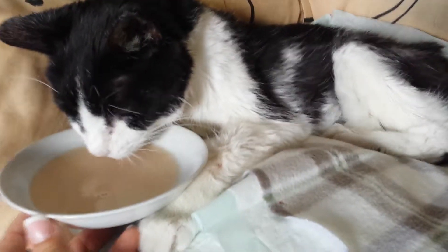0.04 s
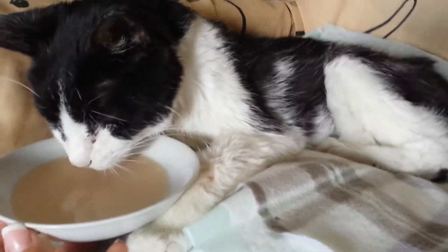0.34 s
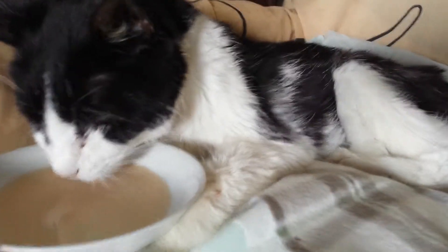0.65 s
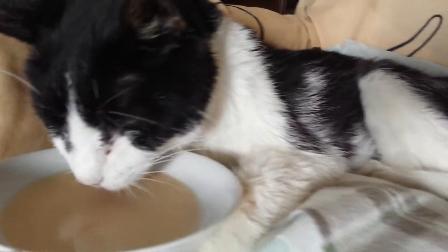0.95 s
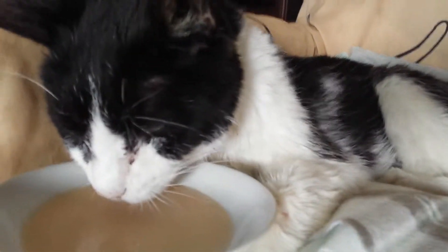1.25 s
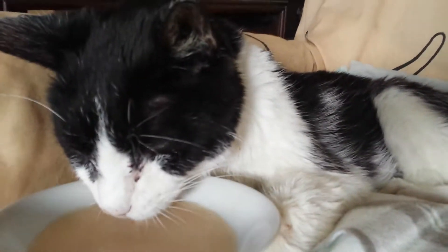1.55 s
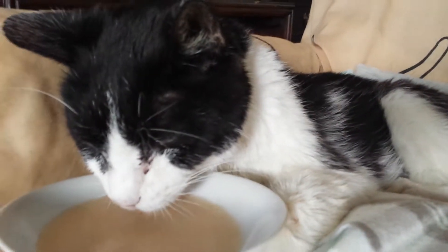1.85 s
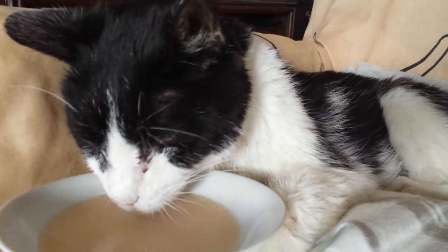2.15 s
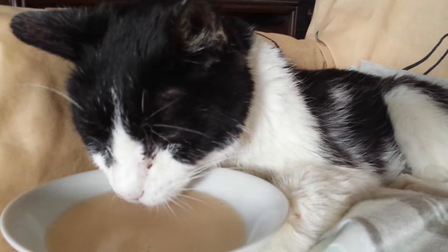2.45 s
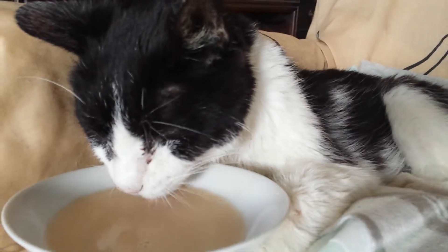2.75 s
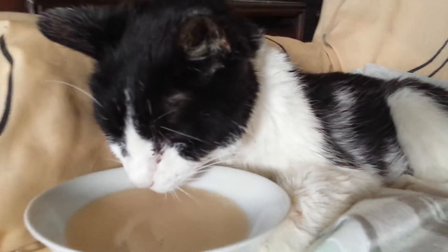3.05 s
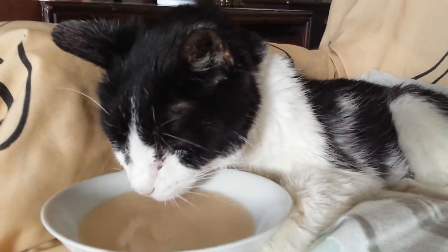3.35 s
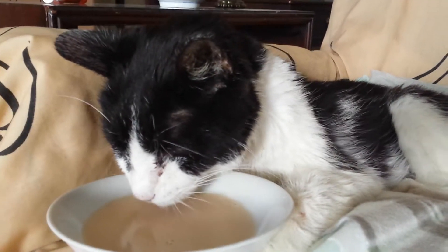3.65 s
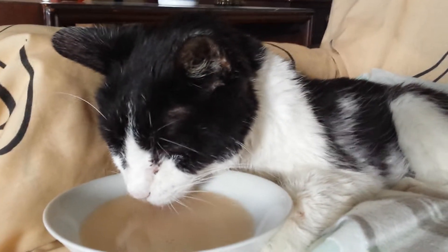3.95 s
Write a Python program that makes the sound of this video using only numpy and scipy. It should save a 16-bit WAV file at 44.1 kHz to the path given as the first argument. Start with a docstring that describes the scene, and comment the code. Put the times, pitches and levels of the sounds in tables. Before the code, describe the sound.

Small wet clicks of a cat drinking from a bowl continue unevenly, heard up close indoors. Cloth brushes softly and the microphone is bumped near the start, as a low hum sinks slightly in pitch and fades.

```python
"""Cat lapping, close up

Indoors, a cat laps from a bowl close to a phone's stereo microphone: each wet tick of the tongue
is a low pop, a bright ring and a tiny snap. Two low drones, like engines outside, sink in pitch
and fade over the wash of the room. Nearby, a soft rustle, coloured by the left microphone port,
dies away in the first half; cloth brushes and the hand rumbles on the phone."""
import sys
import numpy as np
from scipy import signal
from scipy.fft import rfft, irfft
from scipy.io import wavfile
from scipy.ndimage import uniform_filter1d

SR = 44100
rng = np.random.default_rng(int(sys.argv[2]) if len(sys.argv) > 2 else 0)


def to_wav(s):
    """Save 16-bit WAV."""
    ch = np.atleast_2d(s).T  # columns
    pcm = np.round(np.clip(ch, -1, 1) * 32767)  # PCM
    wavfile.write(sys.argv[1], SR, pcm.astype(np.int16))


N = 176400
TIME_S = np.arange(N) / SR
BIN_HZ = np.maximum(np.arange(N // 2 + 1) * SR / N, 1)


def undb(db):
    """Decibels to gain."""
    return 10 ** (np.asarray(db) / 20)


def stereo(left_db, right_db):
    """Gains for the two channels."""
    return undb([[left_db], [right_db]])


def curve(rows):
    """Join (time_s, value) rows by straight lines."""
    return np.interp(TIME_S, *np.array(rows).T)


def colour(rows):
    """Gain by frequency from (freq_hz, level_db) rows."""
    hz, db = np.array(rows).T
    return undb(np.interp(np.log(BIN_HZ), np.log(hz), db))


def resonance(hz, width_hz):
    """Complex gain of one resonance."""
    return 1 / (1 + 1j * (BIN_HZ ** 2 - hz ** 2) / (BIN_HZ * width_hz))


def noise(spectrum):
    """Noise of rms 1 with the given spectrum."""
    x = irfft(rfft(rng.standard_normal(N)) * spectrum, N)
    return x / x.std()


def wander(rate_hz):
    """Smooth random motion of rms 1."""
    return noise(np.exp(-(BIN_HZ / rate_hz) ** 2))


def swell(t, peak_s):
    """An envelope that rises to 1 at peak_s and dies away."""
    u = np.maximum(t, 0) / peak_s
    return u * np.exp(1 - u)


def bell(centre_s, spread_s):
    """A bell-shaped envelope."""
    return np.exp(-((TIME_S - centre_s) / spread_s) ** 2)


def add(out, start_s, sound):
    """Mix a short stereo sound in."""
    i = int(np.clip(start_s * SR, 0, N - 1))
    out[:, i:i + sound.shape[1]] += sound[:, :N - i]


def drone(pitch, level, partials, roughness):
    """A dull tone that swells and dips, with weaker, rougher partials that fade more evenly."""
    phase = 2 * np.pi * np.cumsum(curve(pitch)) / SR
    gain = undb(curve(level))
    trend = uniform_filter1d(gain, int(.8 * SR))  # 0.8 s average
    out = 0
    for multiple, db, rough in [(1, 0, roughness)] + partials:
        waver = np.sqrt(2 * (1 - rough ** 2)) + rough * (wander(7) + 1j * wander(7))
        tone = np.real(waver * np.exp(1j * multiple * phase))
        out += (gain if multiple == 1 else trend) * undb(db) * tone
    return out


# Sinking pitch of each drone: time_s, pitch_hz
LOW_DRONE_PITCH = [(0, 129), (.5, 126), (.7, 117.5), (.9, 111), (1.15, 107.5), (1.4, 109.5), (1.7, 110.5),
                   (2.1, 108.5), (3, 108), (4, 106.5)]
HIGH_DRONE_PITCH = [(0, 229.5), (.7, 226), (1.4, 224), (2.3, 220.5), (3, 217), (4, 215)]
# Their swells and dips: time_s, level_db
LOW_DRONE_LEVEL = [(0.0, -29), (0.05, -27.5), (0.13, -31), (0.23, -45), (0.24, -39), (0.3, -32),
                   (0.53, -37.5), (0.56, -44.5), (0.62, -31.5), (0.67, -32.5), (0.7, -60), (0.72, -36.5),
                   (0.88, -31.5), (1.02, -37.5), (1.08, -44), (1.16, -35), (1.28, -41.5), (1.32, -33),
                   (1.39, -31.5), (1.47, -49), (1.5, -40.5), (1.71, -38.5), (1.87, -45), (1.98, -71),
                   (2.05, -44), (2.31, -64), (2.54, -50.5), (3.78, -59.5), (3.82, -48), (4.0, -49)]
HIGH_DRONE_LEVEL = [(0.0, -65), (0.03, -44), (0.38, -49.5), (0.67, -41.5), (0.79, -44.5), (0.87, -55),
                    (0.91, -43), (0.96, -46.5), (0.99, -52), (1.09, -60.5), (1.2, -44.5), (1.27, -40),
                    (1.67, -43), (2.04, -55.5), (2.16, -53.5), (2.22, -45.5), (2.28, -48), (2.35, -60.5),
                    (2.64, -47.5), (2.75, -59.5), (2.87, -51), (3.02, -53.5), (3.1, -67), (3.36, -53),
                    (3.42, -62), (3.54, -48.5), (3.6, -49.5), (3.82, -63.5), (3.93, -59), (4.0, -61)]
# Their partials: pitch_ratio, relative_db, roughness_fraction
LOW_PARTIALS = [(0.629, -14, .3), (.84, -21, .6), (1.36, -22, .3)]
HIGH_PARTIALS = [(1.5, -23, .3), (2, -26, .4)]


def distant_drones():
    """Two drones, like engines outside, a touch left of centre."""
    low = drone(LOW_DRONE_PITCH, LOW_DRONE_LEVEL, LOW_PARTIALS, roughness=.08)
    high = drone(HIGH_DRONE_PITCH, HIGH_DRONE_LEVEL, HIGH_PARTIALS, roughness=.05)
    return (low + high) * stereo(.8, -.8)


# Room tone, then its side signal against its mid: freq_hz, relative_db
ROOM_SPECTRUM = [(20, -20), (35, 0.5), (55, -8.5), (85, 7), (130, 1), (180, -3), (270, -8.5), (400, -13),
                 (600, -18.5), (1000, -21), (1600, -29), (3000, -35.5), (6000, -39), (15000, -42)]
ROOM_SIDE = [(30, -17), (80, -19), (200, -8), (500, -7.5), (1000, -2.5), (2000, 0)]
# Fade of the room tone: time_s, relative_db
ROOM_LEVEL = [(0.0, -48), (0.01, -49), (0.1, -54), (1.45, -58), (1.47, -56.5), (1.84, -57.5), (1.85, -56),
              (1.95, -59.5), (3.56, -66), (3.59, -63), (3.92, -65), (4.0, -60.5)]


def room_wash():
    """Dull room noise that fades with the drones; its bass is alike in both channels."""
    spectrum = colour(ROOM_SPECTRUM)
    mid = noise(spectrum)
    side = irfft(rfft(noise(spectrum)) * colour(ROOM_SIDE), N)
    return np.array([mid + side, mid - side]) * undb(curve(ROOM_LEVEL)) * stereo(11.2, 9.8)


# Rustle near the microphone: freq_hz, relative_db
RUSTLE_SPECTRUM = [(500, -3.5), (1500, -3.5), (2500, 1), (4000, -2.5), (7000, 4), (8300, -1.5), (10000, -4),
                   (14500, -9.5)]
# Its fade: time_s, relative_db
RUSTLE_FADE = [(0, -53.5), (.06, -55), (.17, -61.5), (.4, -57.5), (.65, -54), (.85, -55), (1.17, -55.5),
               (1.33, -62.5), (1.75, -63), (2.05, -68), (2.42, -72.5), (2.9, -68.5), (3.2, -73.5), (4, -70)]
# Resonances of the microphone ports: freq_hz, width_hz, left_db, right_db
MIC_PORTS = [(2400, 500, 4, -20), (5600, 1260, 3.5, -16), (6650, 580, 7, -10)]


def close_rustle():
    """A soft, grainy rustle close by rings the microphone ports, mostly the left."""
    gain = undb(curve(RUSTLE_FADE) + wander(98))
    out = []
    for side in range(2):
        port_power = sum(abs(undb(db[side]) * resonance(hz, width)) ** 2 for hz, width, *db in MIC_PORTS)
        rustle = noise(colour(RUSTLE_SPECTRUM)) * gain
        out.append(irfft(rfft(rustle) * np.sqrt(1 + port_power), N))
    return np.array(out)


# Handling noise at the microphone: freq_hz, relative_db
RUMBLE_SPECTRUM = [(12, -2), (30, -2), (50, -8), (100, -32), (400, -60)]


def hand_rumble():
    """The hand rumbles on the left side of the phone."""
    return np.array([undb(-63) * noise(colour(RUMBLE_SPECTRUM)), np.zeros(N)])


# Strokes of cloth, to the left: centre_s, spread_s, level_db
CLOTH_STROKES = [(0.043, 0.1, -52.5), (0.524, 0.13, -55.5)]
# Their colour: freq_hz, relative_db
CLOTH_SPECTRUM = [(300, -12), (800, -1), (1350, 7), (1800, 0), (2300, 2), (3100, -3), (4200, -31),
                  (9000, -40)]


def cloth_brushes():
    """Cloth slides briefly, with an uneven grain."""
    strokes = sum(undb(db) * bell(at, spread) for at, spread, db in CLOTH_STROKES)
    grain = undb(2 * wander(60))
    friction = np.array([noise(colour(CLOTH_SPECTRUM)) for _ in range(2)])
    return friction * strokes * grain * stereo(0, -5)


def port_time(samples, left_delay_s=.00019):
    """Time at each microphone port: sound from the bowl reaches the right one first."""
    return np.arange(samples) / SR - np.array([[left_delay_s], [0]])


def tick(pop_hz, pop_db, ring_hz, ring_db, snap_db):
    """A film of liquid breaks: pop and ring are louder on the left, the snap on the right."""
    pop_rise_cycles, ring_rise_s, snap_rise_s = .35, .00025, .00014
    t = port_time(256)
    pop_t = t - ring_rise_s / 2
    pop = swell(pop_t, pop_rise_cycles / pop_hz) * np.sin(2 * np.pi * pop_hz * pop_t)
    ring = swell(t, ring_rise_s) * np.sin(2 * np.pi * ring_hz * t)
    burst = swell(t, snap_rise_s) * rng.standard_normal(t.shape)
    snap = signal.sosfilt(signal.butter(1, (8500, 10500), "band", fs=SR, output="sos"), burst)
    snap /= abs(snap).max(axis=1, keepdims=True)
    return (pop * undb(pop_db) * stereo(4, -2.5)
            + ring * undb(ring_db) * stereo(4, -11)
            + snap * undb(snap_db) * stereo(-1, 4))


def spit(ticks_per_s=17):
    """Tiny ticks of spit, scattered at random among the laps."""
    out = np.zeros((2, N))
    for _ in range(int(ticks_per_s * N / SR)):
        strength, pop_pitch, pop_strength, ring_pitch = np.clip(rng.standard_normal(4), -2, 2)
        db = -68.5 + 2 * strength
        sound = tick(pop_hz=2500 * np.exp(.2 * pop_pitch), pop_db=db - 5 + 3 * pop_strength,
                     ring_hz=6800 * np.exp(.05 * ring_pitch), ring_db=db, snap_db=db)
        add(out, rng.random() * N / SR, sound)
    return out


# Tongue at the bowl, levels relative: start_s, pop_hz, pop_db, ring_hz, ring_db, snap_db
TONGUE_TICKS = [(0.2594, 2200, -35, 6610, -49, -66), (0.5525, 2100, -41, 6970, -44, -50),
                (0.6451, 2540, -39, 6340, -34, -49), (0.6556, 2380, -53, 6560, -36, -42),
                (0.6667, 2800, -36, 6680, -38, -55), (0.7372, 2630, -62, 6860, -37.5, -64),
                (0.769, 2380, -53, 5680, -40, -67), (0.908, 2340, -39, 7220, -40, -47),
                (0.9782, 1980, -40, 6390, -42, -59), (1.0084, 2470, -33, 6820, -47, -45),
                (1.103, 2700, -38, 6660, -59, -65), (1.181, 4360, -55, 6870, -41, -51),
                (1.2842, 1830, -40.5, 7100, -37, -54), (1.3612, 2660, -36.5, 6390, -54, -47),
                (1.4313, 1860, -36.5, 6100, -48, -65), (1.4514, 2590, -55, 7240, -38.5, -43),
                (1.525, 1830, -52, 7000, -40, -62), (1.5676, 2920, -33.5, 6500, -45, -58),
                (1.5703, 2210, -53, 7150, -34.5, -51), (1.71, 2000, -37, 6800, -40, -47),
                (1.7499, 2650, -34.5, 7700, -42.5, -50), (1.8573, 2450, -59, 7210, -68, -52),
                (1.9294, 1640, -64, 6560, -50, -57), (1.9758, 1540, -48.5, 6650, -49, -63),
                (2.0792, 1920, -42, 7190, -43.5, -51), (2.1534, 2800, -46, 6330, -54, -63),
                (2.1673, 2430, -41.5, 6400, -53, -66), (2.2713, 2390, -44, 6840, -51, -55),
                (2.3069, 2370, -57, 6500, -50, -59), (2.4194, 2170, -51, 6770, -65, -72),
                (2.4697, 2110, -46, 6480, -52, -64.5), (2.474, 1920, -44.5, 5820, -49.5, -61),
                (2.5233, 2540, -39.5, 6540, -42.5, -64), (2.6018, 2420, -51, 6980, -49, -55),
                (2.7248, 1510, -47, 6920, -56, -71), (2.879, 1740, -47.5, 6940, -48.5, -51),
                (2.961, 1860, -45, 6400, -47, -65), (3.055, 3120, -39.5, 7200, -30, -49),
                (3.1235, 2540, -50, 7200, -48, -60), (3.314, 2660, -47, 6600, -43, -44),
                (3.3315, 3140, -55, 7400, -48, -62), (3.4513, 2470, -44, 6950, -47, -52),
                (3.4988, 2690, -39.5, 7000, -37.5, -61), (3.507, 3050, -47, 6870, -48, -60),
                (3.547, 2140, -56, 6700, -49, -48), (3.7158, 3670, -72, 7220, -47, -44),
                (3.8142, 2590, -42, 6570, -54, -72), (3.8451, 2600, -37.5, 6680, -38, -63),
                (3.9633, 2820, -65, 6770, -49, -58)]


def tongue():
    """The tongue breaks films of liquid close to the microphone."""
    out = np.zeros((2, N))
    for start_s, *row in TONGUE_TICKS:
        add(out, start_s, tick(*row))
    return out


# Bump on the phone: centre_s, level_db
HANDLING_BUMPS = [(0.309, -33.5)]
# Its colour: freq_hz, relative_db
BUMP_SPECTRUM = [(25, -12), (45, -4), (70, 1), (95, -0.5), (170, -10), (300, -33.5), (1000, -59)]


def handling_bump():
    """Handling gives a soft, low bump, the same in both channels."""
    return sum(undb(db) * bell(at, spread_s=.054) * noise(colour(BUMP_SPECTRUM))
               for at, db in HANDLING_BUMPS)


# Bubbles at the bowl: start_s, pitch_hz, level_db, right_offset_db
BUBBLE_BURSTS = [(.6562, 10560, -45.5, -3), (.667, 3200, -43, 6.5), (.6675, 4170, -41.5, 0),
                 (.818, 2850, -43, -6), (.9784, 1900, -45, -4), (1.103, 2690, -43, 3),
                 (1.181, 10400, -49, -5), (1.5668, 4400, -39, -1), (1.567, 1400, -46, -2),
                 (3.3148, 5400, -54, 2), (3.8453, 2300, -47, -5)]


def bubbles():
    """Tiny bubbles ring for a few milliseconds as they burst."""
    out = np.zeros((2, N))
    t = port_time(512)
    for start_s, hz, db, right_db in BUBBLE_BURSTS:
        ring = swell(t, peak_s=.00048) * np.sin(2 * np.pi * hz * t)
        add(out, start_s, ring * stereo(db, db + right_db))
    return out


# Faint tones, to the left: centre_s, spread_s, pitch_hz, width_hz, level_db
THIN_TONES = [(1.788, 0.062, 2400, 460, -62), (2.607, 0.055, 2440, 300, -63.5),
              (3.04, 0.11, 2410, 570, -69.5), (3.28, 0.12, 2300, 310, -70.5), (3.58, .05, 2270, 440, -69),
              (3.627, .12, 6710, 70, -61), (1.544, .2, 332.6, 10, -60), (3.797, 0.4, 321, 13, -61.5)]
# Their balance at the microphone: freq_hz, right_offset_db
TONE_BALANCE = [(300, -2.5), (2400, -5.5), (6800, -22)]


def thin_tones():
    """Narrow bands of noise swell and fade as faint, thin tones."""
    out = np.zeros((2, N))
    for at, spread, hz, width, db in THIN_TONES:
        band = np.array([noise(resonance(hz, width) ** 2) for _ in range(2)])
        right_db = np.interp(hz, *np.array(TONE_BALANCE).T)
        out += band * bell(at, spread) ** 2 * stereo(db, db + right_db)
    return out


def room_tail(sound, level_db=-17, t60_s=.07):
    """The short reverberation of a softly furnished room."""
    t = np.arange(SR // 5) / SR
    tail = rng.standard_normal((2, len(t))) * undb(-60 * t / t60_s)
    tail *= undb(level_db) / np.sqrt((tail ** 2).sum(axis=1, keepdims=True))
    return signal.fftconvolve(sound, tail, axes=1)[:, :N]


def scene():
    """The cat close in front of the microphone, the drones and the room behind."""
    behind = distant_drones() + room_wash()
    near = close_rustle() + hand_rumble() + cloth_brushes() + handling_bump()
    lapping = spit() + tongue() + bubbles()
    return behind + near + lapping + room_tail(lapping) + thin_tones()


def record(dry, hiss_db=-64.5, top_hz=14650):
    """The phone adds its own hiss and cuts the top."""
    hiss = undb(hiss_db) * rng.standard_normal(dry.shape)
    return signal.sosfilt(signal.ellip(10, .1, 70, top_hz, fs=SR, output="sos"), dry + hiss)


dry = scene()
out = record(dry)
to_wav(out)
```